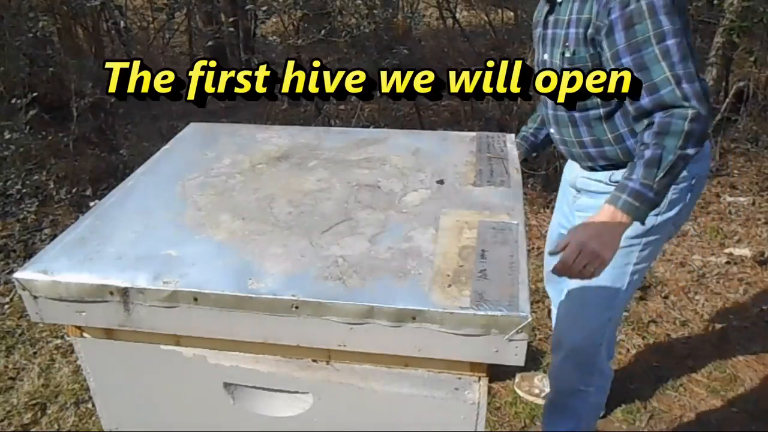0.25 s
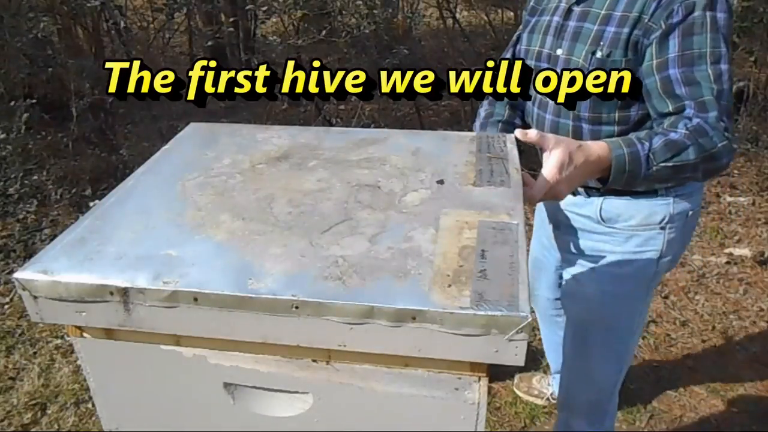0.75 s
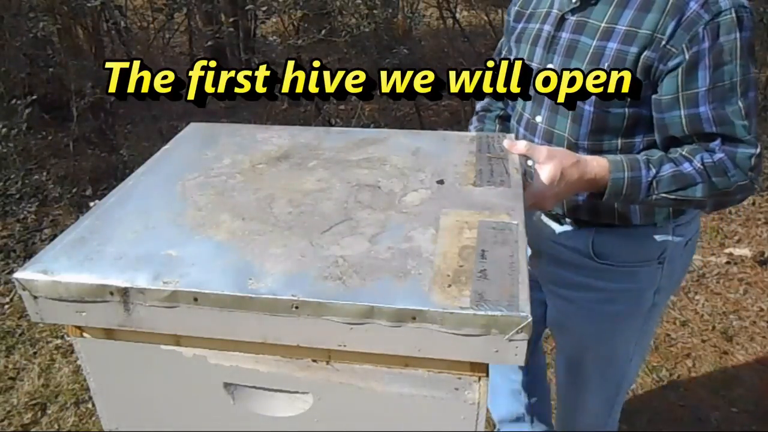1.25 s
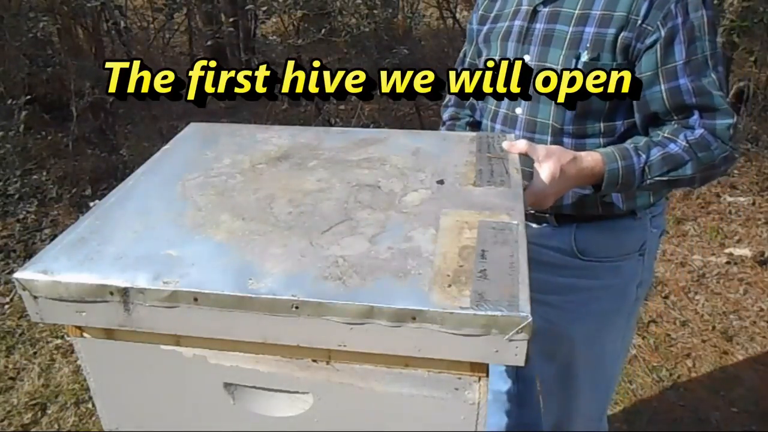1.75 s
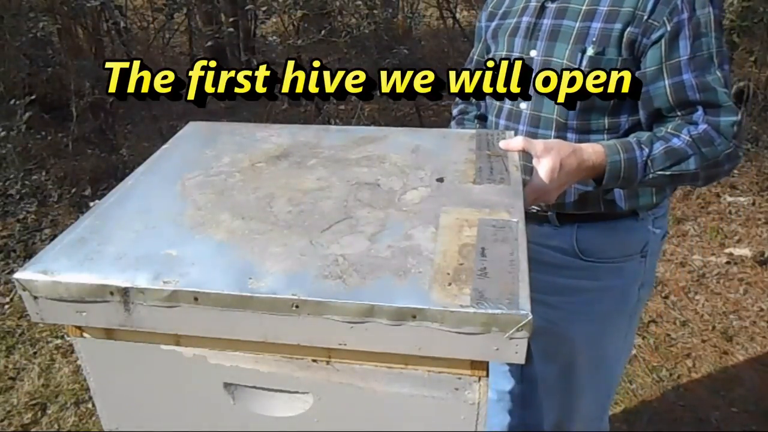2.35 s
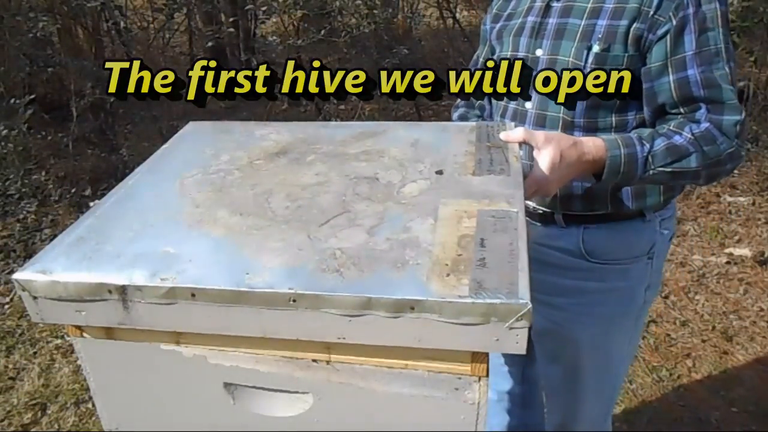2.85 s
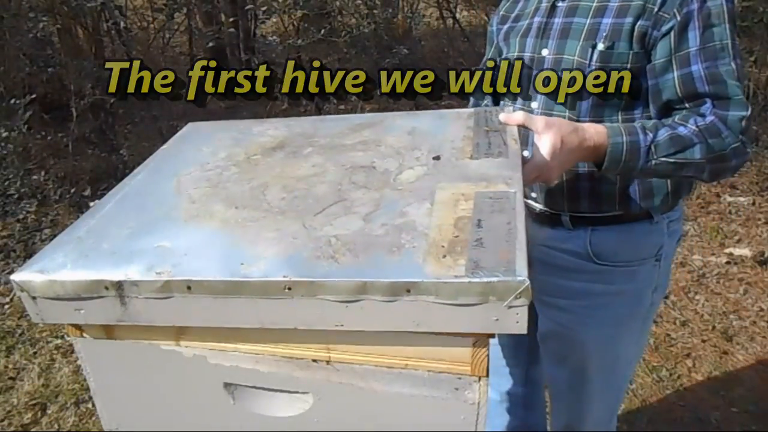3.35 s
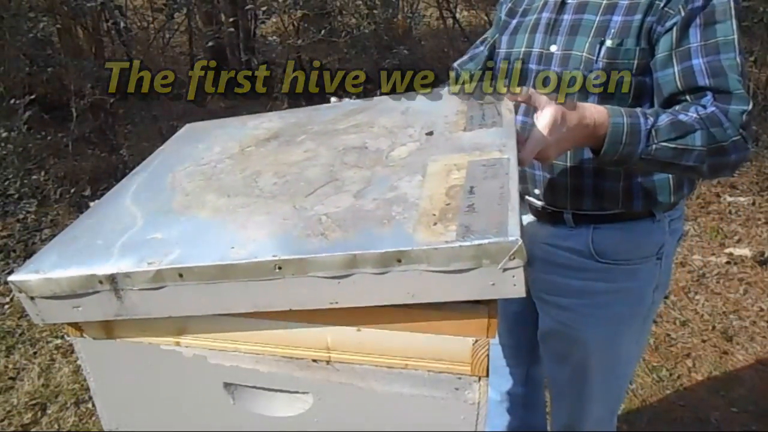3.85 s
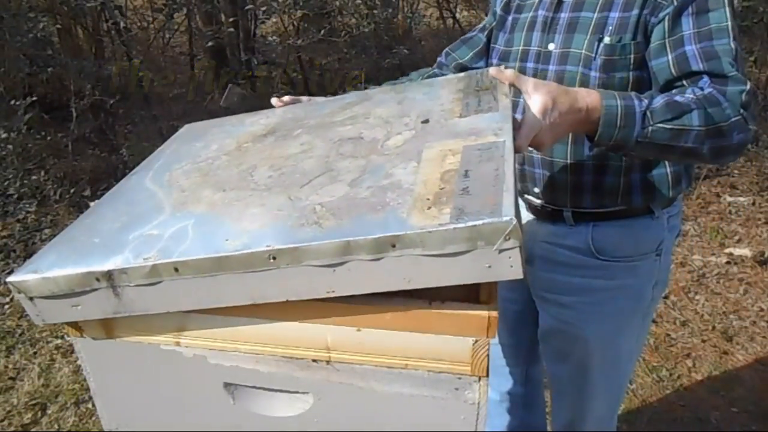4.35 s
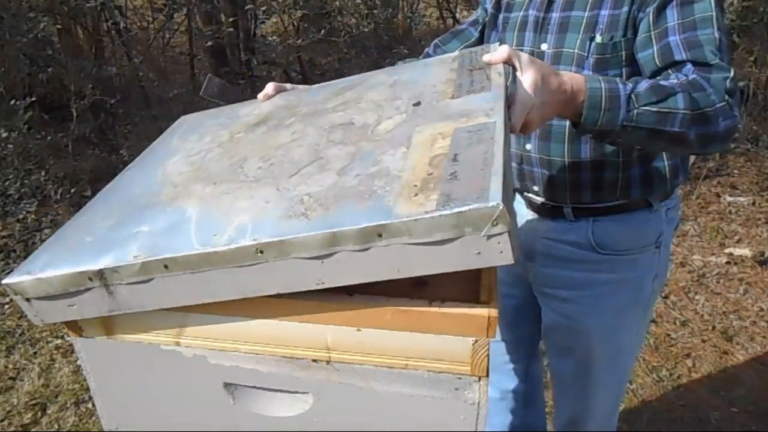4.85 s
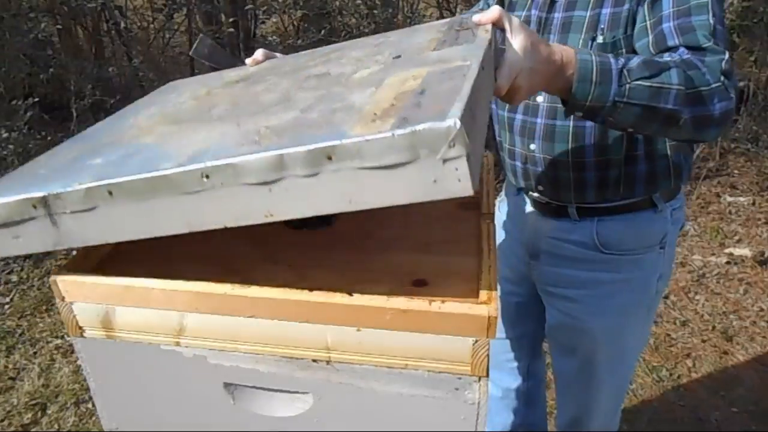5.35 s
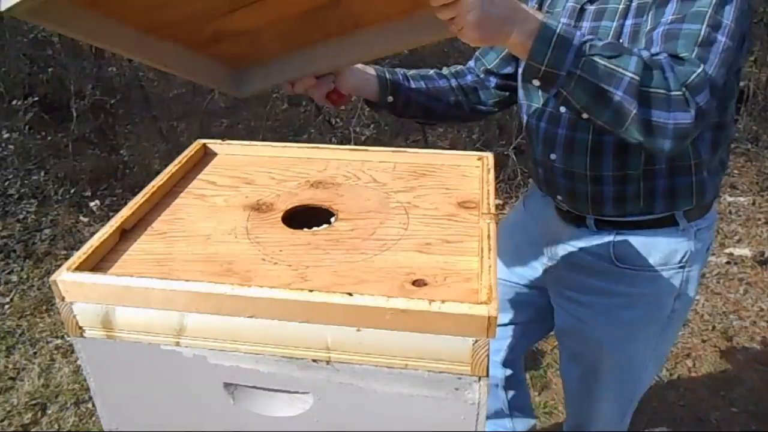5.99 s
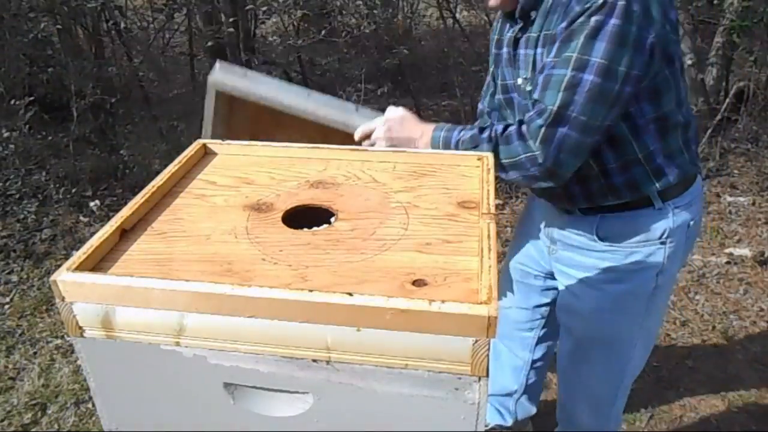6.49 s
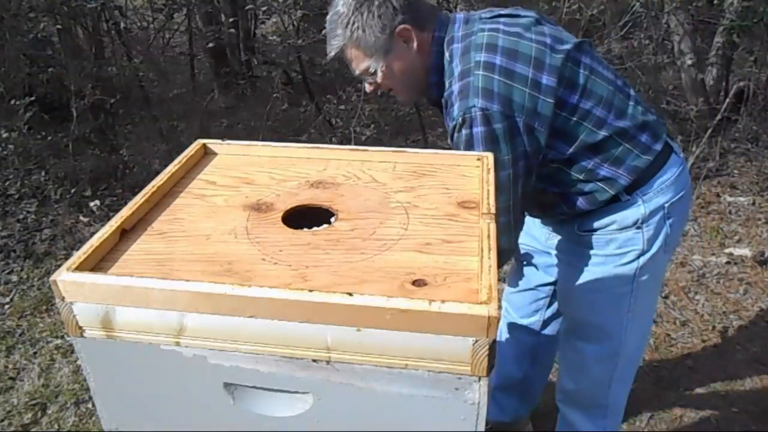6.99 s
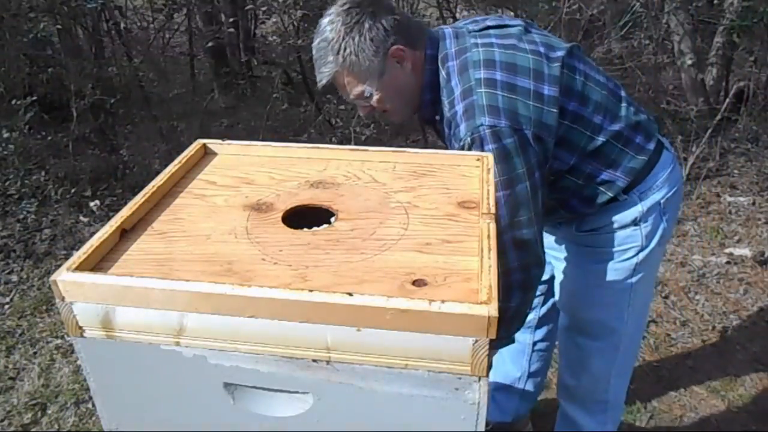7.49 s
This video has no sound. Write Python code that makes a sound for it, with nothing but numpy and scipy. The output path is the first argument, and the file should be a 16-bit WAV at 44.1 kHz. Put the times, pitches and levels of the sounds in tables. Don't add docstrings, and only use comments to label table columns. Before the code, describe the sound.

Close to a small microphone at a wood's edge, leaves and cloth rustle over a faint steady hiss. Tiny brittle ticks lead to one very loud, dry wood-and-tin crack with a hollow box knock, followed at once by a smaller clack. After a quiet gap, sharp snaps mark the cover tilting, then a short gritty scrape as it slides free. Light knocks and leaf rustling follow while a far bird whistles in quick slurs.

```python
import sys
import numpy as np
from scipy import signal
from scipy.fft import rfft, irfft, next_fast_len
from scipy.io import wavfile
from scipy.ndimage import uniform_filter1d, minimum_filter1d, map_coordinates

SR = 44100
rng = np.random.default_rng(int(sys.argv[2]) if len(sys.argv) > 2 else 0)


def bounce(signal):
    frames = np.transpose(np.atleast_2d(signal))
    limited = np.clip(frames, -1, 1)
    pcm = np.round(limited * 32767).astype(np.int16)
    wavfile.write(sys.argv[1], SR, pcm)


def to_linear_factor(level_db):
    exponent = np.asarray(level_db, float) / 20
    return 10 ** exponent


N = 340893
CLOCK = np.arange(N) / SR


def unit(x):
    return x / np.sqrt(np.mean(x ** 2) + 1e-20)


def along(points, hz):
    f, v = np.transpose(points)
    return np.interp(np.log(hz + 1), np.log(f + 1), v)


def curves(rows):
    s, *columns = np.transpose(sorted(map(tuple, rows)))
    return [np.interp(CLOCK, s, column) for column in columns]


def filtered(x, response):
    m = next_fast_len(N + SR // 2)
    return irfft(rfft(x, m) * response(np.fft.rfftfreq(m, 1 / SR)), m)[:N]


def body(peaks):
    return lambda f: sum(to_linear_factor(db) * 1j * f * w / (c * c - f * f + 1j * f * w) for c, w, db in peaks)


def steep(hz, width_hz):
    return lambda f: body([(hz, width_hz, 0)])(f) ** 2


def dulled(x, hz):
    low_pass = signal.butter(4, min(hz, SR / 2.2), fs=SR, output="sos")
    return signal.sosfilt(low_pass, x)


def grit(per_s, spread_db, bed):
    sizes = to_linear_factor(spread_db * rng.random(N)) * rng.choice([-1, 1], N)
    sparks = (rng.random(N) < per_s / SR) * sizes
    return unit(unit(sparks) + bed * rng.standard_normal(N))


def air():
    # start_s, level_db
    hiss_level = [(0, -53), (.8, -52), (1.4, -52),
                  (1.7, -53), (1.9, -52.5), (2.22, -55.5), (2.74, -54), (4.42, -54), (5.4, -52), (7.73, -52)]
    # pitch_hz, level_db per Hz
    hiss_colour = [(76, -42.5), (130, -11), (314, -9.5), (465, -4.5), (572, -6), (832, -1.5), (967, -4),
                   (1230, -3.5), (1830, -7), (2090, -6), (2520, -8.5), (4420, -17.5), (11500, -36.5),
                   (15000, -79.5), (22000, -120)]
    # pitch_hz, width_hz, level_db
    fuzzy = [(286, 10, -81.5), (460, 16, -78.5), (836, 34, -71.5), (2001, 45, -70.5)]
    # pitch_hz, level_db
    motor = [(35.2, -76.5), (105.7, -73), (846, -75.5)]
    # pitch_hz, level_db per Hz
    rumble_colour = [(10, -22), (20, -0.5), (50, -1.5), (70, -9), (130, -5), (170, -37), (400, -120)]
    z = signal.stft(rng.standard_normal(N), nperseg=512)[2]
    patches = uniform_filter1d(uniform_filter1d(rng.standard_normal(z.shape), 6, 0), 12, 1)
    noise = signal.istft(z * to_linear_factor(0.66 * unit(patches)), nperseg=512)[1][:N]
    out = to_linear_factor(curves(hiss_level)[0] - 1.92) * unit(filtered(noise, lambda f: to_linear_factor(along(hiss_colour, f))))
    for hz, width, db in fuzzy:
        drone = filtered(rng.standard_normal(N), lambda f: np.exp(-((f - hz) / width) ** 2))
        out += to_linear_factor(db) * unit(drone)
    for hz, db in motor:
        out += to_linear_factor(db + 1.5) * np.sin(2 * np.pi * hz * CLOCK)
    rumble = filtered(rng.standard_normal(N), lambda f: to_linear_factor(along(rumble_colour, f)))
    return out + to_linear_factor(-75) * unit(rumble)


def bird():
    # start_s, length_s, middle_hz, rise_hz, level_db
    falls = [(4.58, 0.045, 3350, -900, -65), (4.865, .04, 3150, -500, -66),
             (6.032, 0.051, 3580, -1400, -59), (6.602, 0.041, 4000, -1300, -61),
             (6.795, 0.04, 3480, -1000, -59.5), (5.5, .022, 3300, -400, -62)]
    # start_s, length_s, middle_hz, rise_hz, level_db
    dips = [(3.83, .058, 3260, -79, -69), (4.41, 0.087, 4120, 1, -72), (6.167, 0.068, 2740, 200, -60),
            (6.335, 0.041, 2700, 102, -60), (6.84, 0.045, 2970, 176.5, -57.5)]
    # start_s, length_s, middle_hz, rise_hz, level_db
    arches = [(4.33, .08, 4350, 0, -70.5), (4.93, .045, 3160, 602, -65.5), (5.345, .04, 3620, 102, -71),
              (5.566, 0.035, 3880, 199.5, -63), (5.612, 0.045, 4250, 151, -68),
              (5.72, 0.062, 4590, 30, -66), (5.73, 0.085, 4380, -45, -69), (6.935, 0.08, 3430, 57.5, -64.5),
              (7.108, .1, 4750, 123.5, -67.5)]
    out = np.zeros(N)
    for notes, bend_hz in ((falls, -60), (dips, 179), (arches, -190)):
        for s, length, mid_hz, rise_hz, db in notes:
            u = np.linspace(0, 1, round(length * SR))
            hz = mid_hz + rise_hz * (u - .5) + bend_hz * (2 * u - 1) ** 2
            hz += 360 * uniform_filter1d(rng.standard_normal(SR // 5), size=90)[:len(u)]
            waver_db = 25 * uniform_filter1d(rng.standard_normal(SR // 5), size=200)[:len(u)]
            loudness = to_linear_factor(db + 6.5 + waver_db) * np.abs(np.sin(np.pi * u)) ** 0.41
            out[round(s * SR):][:len(u)] += loudness * np.sin(2 * np.pi * np.cumsum(hz) / SR)
    return out


def trees(x):
    # pitch_hz, fade_s
    fade = [(300, 0.3), (2000, 0.11), (9000, 0.072)]
    hz, t, z = signal.stft(rng.standard_normal(SR // 2), SR, nperseg=256)
    tail = signal.istft(z * to_linear_factor(-60 * t / along(fade, hz)[:, None]), SR, nperseg=256)[1]
    return signal.fftconvolve(np.pad(x, (300, 0)), tail / np.linalg.norm(tail))[:N]


def rustle():
    # start_s, level_db
    moving = [(0, -72), (.3, -67), (.55, -73), (1.7, -75.5), (1.82, -72.5), (2.18, -72.5), (2.4, -88.5),
              (3.4, -85), (4.3, -80.5), (4.85, -74.5), (5.7, -79), (6.05, -73), (6.7, -71), (7.1, -75.5),
              (7.73, -68.5),
              (.8, -67), (1.22, -67)]
    # peak_s, crisp_db, rise_s, dull_share_db
    swishes = [(.264, -62, .03, -3), (.344, -58.5, .03, -16), (1.372, -55.5, 0.17, 3),
               (1.551, -59, .012, -12), (2.81, -69, 0.15, 13.5), (3.005, -79, .02, 18),
               (3.05, -75, 0.032, 16), (3.24, -75.5, .2, -2), (3.56, -67.5, 0.12, 1),
               (3.72, -68.5, 0.39, -11), (3.91, -74.5, .1, 11.5), (4.19, -74.5, .2, -2.5),
               (4.52, -70.5, 0.27, -6), (4.88, -73, .05, -1), (5.15, -70.5, 0.25, 7),
               (5.58, -75, 0.047, 11), (5.76, -73, .08, 5), (5.89, -57.5, 0.0092, 7), (6.05, -67, .08, -4),
               (6.27, -65, 0.76, 4), (6.78, -80.5, 0.043, 26), (6.96, -77, .04, -10),
               (7.185, -58.5, 0.061, 6), (7.21, -61, 0.1, -1), (7.35, -67.5, 0.34, 4),
               (7.477, -58.5, 0.21, 5.5)]
    # pitch_hz, level_db per Hz
    leaf_colour = [(880, -36.5), (1500, -9.5), (2400, 2), (5770, -2.5), (7010, -15), (9210, -15.5),
                   (10200, -33), (11500, -76), (22000, -120)]
    # pitch_hz, level_db per Hz
    cloth_colour = [(300, -34.5), (700, -16), (1200, -1), (2200, 2.5), (3500, -32), (6000, -59)]
    cloth_db, swell_db, fade_share = 9.5, 31.5, 0.45
    shifting = to_linear_factor(curves(moving)[0])
    s, db, rise, dull_db = np.transpose(swishes)[:, :, None]
    coarse = np.arange(0, N / SR, .002)
    distance = np.maximum((s - coarse) / rise, (coarse - s) / (rise * fade_share))
    swell = to_linear_factor(db - swell_db * distance)
    leaf_swell = np.interp(CLOCK, coarse, np.linalg.norm(swell, axis=0))
    cloth_swell = np.interp(CLOCK, coarse, np.linalg.norm(swell * to_linear_factor(dull_db), axis=0))
    bright = np.hypot(shifting, leaf_swell)
    soft = np.hypot(shifting * to_linear_factor(cloth_db), cloth_swell)
    leaves = unit(filtered(grit(per_s=2500, spread_db=10.5, bed=.8), lambda f: to_linear_factor(along(leaf_colour, f))))
    cloth = unit(filtered(grit(per_s=1200, spread_db=15.0, bed=1.2), lambda f: to_linear_factor(along(cloth_colour, f))))
    return to_linear_factor(12.5) * bright * leaves + to_linear_factor(2.5) * soft * cloth


def thumps():
    # start_s, peak_db, lower_tone_db
    box_knocks = [(0.704, -46.5, -23), (0.768, -50, -5), (1.455, -50.5, -0.5), (2.004, -24.5, -7.5),
                  (2.132, -30.5, -22), (2.987, -48, -19), (3.929, -48.5, -6), (3.942, -46.5, -8),
                  (3.968, -51, -3), (5.973, -48, -26), (6.762, -46, -15.5), (6.773, -46, -18),
                  (6.787, -48.5, -11)]
    # start_s, peak_db
    puffs = [(0.801, -64), (2.799, -65), (3.199, -63.5), (4.996, -52), (5.1, -58), (5.267, -55),
             (5.846, -54.5), (6.046, -72)]
    box_hz, upper_hz, upper_spread, box_t60 = 281, 432, .03, 0.098
    box, wind = np.zeros((2, N + SR))
    t = np.arange(SR // 4) / SR
    for s, db, low_db in box_knocks:
        hz = upper_hz * (1 + upper_spread * rng.standard_normal())
        tones = to_linear_factor(-60 * t / box_t60) * np.sin(2 * np.pi * hz * t)
        tones += to_linear_factor(low_db - 40 * t / box_t60) * np.sin(2 * np.pi * box_hz * t)
        scuff = dulled(7.7 * rng.standard_normal(len(t)), hz=1300)
        tones += .5 * to_linear_factor(-60 * t / box_t60) * scuff
        box[round(s * SR):][:len(t)] += to_linear_factor(db) * tones * (1 - np.exp(-t / 0.0026))
    blast = (1.999, -41.5, 0.032)
    for s, db, length in [(*p, 0.059) for p in puffs] + [blast]:
        push = t / length * np.exp(-3 * t / length)
        wind[round(s * SR):][:len(t)] += to_linear_factor(db + 19.0) * push * (.06 + rng.standard_normal(len(t)))
    return filtered(box, steep(520, 1300)) + to_linear_factor(15.5) * filtered(wind, steep(85, 150))


def slide():
    # start_s, level_db
    drag_level = [(5.03, -66), (5.07, -54), (5.17, -57), (5.2, -78), (5.231, -70), (5.236, -46),
                  (5.246, -40.5), (5.3, -40.5), (5.317, -38.5), (5.321, -44), (5.33, -48), (5.336, -62)]
    # pitch_hz, width_hz, level_db
    rim = [(1325, 270, 4), (2170, 500, -1), (2800, 400, 0.5), (3300, 350, 2.5), (4270, 300, 2),
           (5300, 350, -1.5), (6420, 400, -4), (8270, 400, -7)]
    drag = to_linear_factor(np.interp(CLOCK, *np.transpose(drag_level), left=-120, right=-120))
    drag *= to_linear_factor(1.3 * map_coordinates(rng.standard_normal(2000), [CLOCK * 220]))
    rub = filtered(grit(per_s=990, spread_db=6, bed=1.4), body(rim))
    return drag * unit(filtered(dulled(rub, hz=7200) + 0.18 * rub, steep(3200, 7000)))


def snaps():
    # start_s, peak_db, pitch_hz
    beads = [(1.457, -37, 1800), (1.8254, -32, 5300), (1.8595, -40, 3010), (1.9214, -19, 3930),
             (2.989, -31, 1260), (3.922, -39, 1000), (4.6336, -20.5, 1500), (4.6357, -26, 2300),
             (4.634, -37, 3500), (4.6473, -35, 1600), (1.9797, -33, 2700), (2.082, -34, 4300),
             (4.6405, -25, 1200), (4.647, -30, 1300), (4.699, -20, 3700), (4.7649, -25.5, 5300),
             (4.7648, -33, 3200), (4.7065, -38, 3600), (4.7105, -38, 3500), (4.7698, -43, 2800),
             (4.8225, -43, 3200), (4.8406, -31, 3300), (5.2144, -30, 3090), (6.7605, -39, 1100),
             (6.7655, -37, 960), (6.766, -33, 950), (6.771, -39, 1050), (6.779, -40.5, 1000),
             (6.785, -38, 1150), (5.89, -34, 3070), (6.477, -35.5, 4700), (6.4772, -34, 1300),
             (5.2145, -35, 5600), (5.214, -36, 1700), (4.8407, -39, 5600), (7.398, -34, 6300)]
    cycles, fizz = 10, 0.76
    out, t = np.zeros(N + SR), np.arange(SR // 30) / SR
    for s, db, hz in beads:
        noise = dulled(np.diff(rng.standard_normal(len(t) + 1)), hz=2.2 * hz)
        flick = np.sin(2 * np.pi * hz * t) + fizz * hz / 5000 * noise
        fade = to_linear_factor(db - 60 * t * hz / cycles) * (1 - np.exp(-1.5 * t * hz))
        out[round(s * SR):][:len(t)] += fade * 2.2 * flick
    return dulled(out[:N], hz=9000)


def blows():
    # start_s, tin_peak_db, wood_db
    rattle = [(1.9998, -2, -8), (2.0016, 6, 0.5), (2.0034, -2.5, 0), (2.005, -6, -3), (2.0068, -11, 7),
              (2.0092, -8.5, -5.5), (2.011, -7.5, -5.5), (2.0128, -3, -4), (2.0148, -3, -5),
              (2.017, -11.5, -9), (2.0183, -10.5, -0.5)]
    # start_s, tin_peak_db, wood_db
    settle = [
        (2.021, -24, 2.9),
        (2.0233, -32.5, 4.2),
        (2.027, -31.5, 2.8),
        (2.032, -32, 4.2),
    ]
    # start_s, tin_peak_db, wood_db, crack_db
    drop = [
        (2.1303, -5.5, -8.5, -29.5),
        (2.1314, -7, -10, -29),
        (2.1345, -21, 8, -26),
        (2.139, -22.5, 4, -25),
        (2.1444, -36, 3, -27),
        (2.1544, -39, 9.5, -25),
        (2.16, -45, 6, -22),
        (2.169, -48, 9, -25),
    ]
    # start_s, tin_peak_db, wood_db, crack_db
    pry = [(1.8257, -36.5, -7, -26), (1.8602, -39.5, -2.5, -29), (1.8714, -53.5, -6, -22),
           (1.9214, -26, -13.5, -4.5), (1.938, -29.5, -12, -14), (1.941, -42, 14, -16),
           (1.9578, -39, -6.5, -9), (1.9705, -36, -12, -6), (1.979, -35.5, -12, -4.5),
           (1.9797, -37, -4, -11), (1.985, -40, -3.5, -17.5), (1.9962, -35.5, -2.5, -13.5),
           (1.998, -29.5, -3.5, -14), (2.0796, -30, -25, -8), (2.0843, -29, -13, -7), (2.088, -37, 0, -8.5),
           (2.0922, -36, -5, -12), (2.099, -37, -16, -12)]
    # start_s, tin_peak_db, wood_db, crack_db
    lift = [(4.6322, -48, 19.5, -32), (4.6372, -41, 10.5, -32), (4.6445, -50, 20, -30),
            (4.655, -55.5, 21.5, -27), (4.7, -34, -8, 1), (4.7055, -36, -10, -3), (4.768, -36.5, -7, -5),
            (4.8405, -35.5, -4, -25), (4.8527, -45, -2, -18), (4.8557, -42, -2, -18), (4.8592, -49, 0, -20),
            (5.073, -41, -11, -24), (5.1617, -39, -15, -26), (5.2167, -40, -1, -27)]
    # start_s, tin_peak_db, wood_db
    touches = [(0.2645, -46, 1), (0.3537, -46, 0), (1.4563, -50.5, 13.5), (1.5494, -47, -3),
               (2.9905, -47.5, 9), (3.045, -53, -2.5), (3.9253, -55, 6), (4.159, -53, -12),
               (5.891, -42, -6.5), (5.9725, -53.5, 15), (5.981, -60, 3), (6.19, -60, 3), (6.3987, -45, -5),
               (6.4776, -44, 2.5), (6.763, -61, 13), (6.78, -63, 14), (7.1644, -55, -4)]
    # start_s, crack_db
    ticks = [
        (1.312, -55),
        (4.7304, -49),
        (6.668, -47.5),
        (7.2413, -43),
        (7.467, -38),
        (7.486, -50),
        (7.51, -47),
    ]
    break_crack_db, touch_crack_db, tick_tin_db, tick_wood_db = -30, -37, -3.5, -11
    break_t60, settle_t60, drop_t60, pry_t60, lift_t60, touch_t60 = 0.013, 0.052, 0.022, 0.036, 0.037, 0.071
    break_hard, pry_hard, lift_hard, touch_hard = 0.88, .45, 0.41, 0.67
    hits = [(*r, break_crack_db, break_t60, break_hard) for r in rattle]
    hits += [(*r, break_crack_db, settle_t60, break_hard) for r in settle]
    hits += [(*r, drop_t60, break_hard) for r in drop]
    hits += [(*r, pry_t60, pry_hard) for r in pry]
    hits += [(*r, lift_t60, lift_hard) for r in lift]
    hits += [(*r, touch_crack_db, touch_t60, touch_hard) for r in touches]
    hits += [(s, db + tick_tin_db, tick_wood_db, -tick_tin_db, pry_t60, touch_hard) for s, db in ticks]
    return hits


def contacts():
    # pitch_hz, width_hz, level_db
    wood_tones = [(440, 360, -36), (1000, 360, -17), (1446, 120, 6.5), (1630, 2700, 5), (1880, 240, -0.5)]
    # pitch_hz, width_hz, level_db
    tin_tones = [(2760, 850, 3), (3500, 1200, -1), (4350, 270, 2.5), (6000, 490, -49.5)]
    # pitch_hz, width_hz, level_db
    panel = [(480, 65, -12), (930, 69, -9), (1100, 77, -5.5), (1318, 70, -3), (1620, 49, -3),
             (1980, 90, -2.5), (2130, 63, -6), (2300, 70, -6.5), (2740, 97, -2.5), (2866, 99, -2.5),
             (3180, 70, -4), (3640, 82, -10), (4600, 130, -4), (5730, 120, -11)]
    force, t = np.zeros((3, N + SR)), np.arange(SR // 5) / SR
    for s, db, wood_db, crack_db, t60, hard in blows():
        level = to_linear_factor(db + np.array([[wood_db + 0.0], [-3], [crack_db - 3.5]]))
        fade = to_linear_factor(-60 * t / (t60 * np.array([[1.4], [.95], [.8]])))
        chatter = fade * rng.standard_normal((3, len(t)))
        chatter *= 1 + hard * 1.8 * np.exp(-t / 0.00055)
        chatter[:, 0] = hard * np.array([2.5, 5.5, 5.5])
        force[:, round(s * SR):][:, :len(t)] += level * chatter
    wood = filtered(force[0], lambda f: body(wood_tones)(f) * steep(1300, 3500)(f))
    tin = filtered(force[1], lambda f: body(tin_tones)(f) * body([(3800, 5000, 0)])(f))
    crack = filtered(force[2], steep(8000, 7000))
    ring = to_linear_factor(2) * filtered(dulled(force[0], hz=1800) + dulled(force[1], hz=7000), body(panel))
    return ring + to_linear_factor(-1.0) * dulled(wood, hz=2820) + to_linear_factor(1.5) * dulled(tin, hz=6470) + dulled(crack, hz=9470)


def scene():
    high_pass = signal.butter(4, 380, "high", fs=SR, output="sos")
    knocks = signal.sosfilt(high_pass, contacts() + snaps())
    knocks = filtered(knocks, lambda f: (1j * f + 450) / (1j * f + 1100))
    near, far = knocks + thumps() + slide(), bird()
    echo = trees(to_linear_factor(-25.0) * knocks + to_linear_factor(-17) * far)
    return (near + far + echo + rustle() + air())[None]


def top_cut(x):
    return signal.sosfilt(signal.butter(12, 11660, fs=SR, output="sos"), x)


def record(dry):
    # pitch_hz, level_db
    mic_colour = [(20, -1), (3300, 2), (3700, 0.5), (6300, 1), (6800, 0.5), (9500, -1.5)]
    # pitch_hz, level_db
    band_limit = [(20, 0), (10000, 0), (10600, -5), (11200, -12), (11650, -21), (11900, -60), (20000, -80)]
    # start_s, level_db
    overload = (2.0036, 12)
    held = dry[0] / (1 + np.abs(dry[0] / 1.1) ** 4) ** (1 / 4)
    held += filtered(dry[0] - held, lambda f: 1 / (1 + (f / 250) ** 4))
    heard = filtered(held, lambda f: to_linear_factor(along(mic_colour, f)))
    heard = dulled(dulled(heard, hz=10000), hz=10540)
    at = round(overload[0] * SR)
    heard[at] -= np.sign(heard[at]) * to_linear_factor(overload[1])
    heard = filtered(heard, lambda f: to_linear_factor(along(band_limit, f)))
    needed = .93 / np.maximum(np.abs(heard), .93)
    gain = uniform_filter1d(minimum_filter1d(needed, size=61), size=61)
    return top_cut((heard * gain)[None])


dry = scene()
out = record(dry)
bounce(out)
```